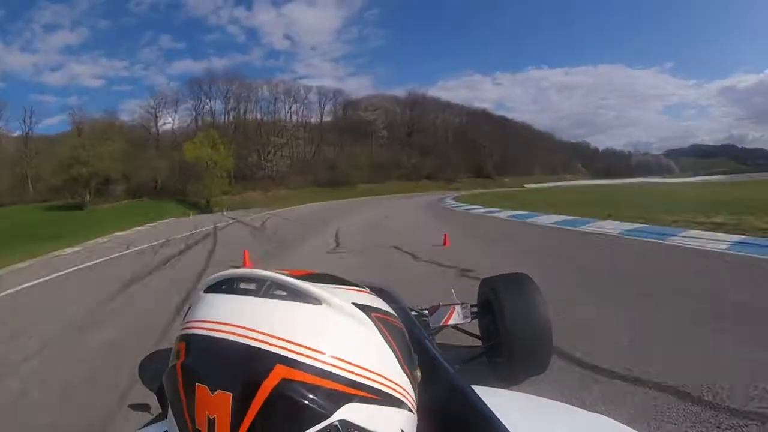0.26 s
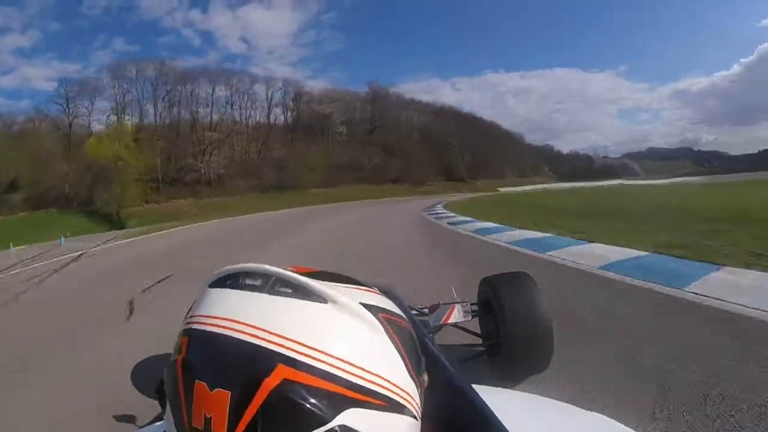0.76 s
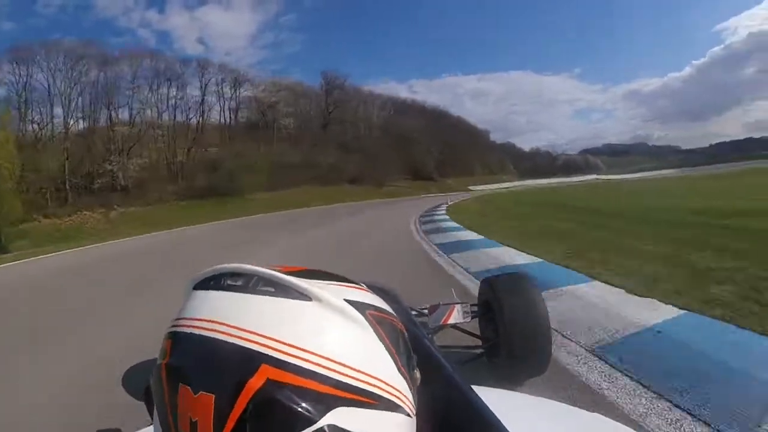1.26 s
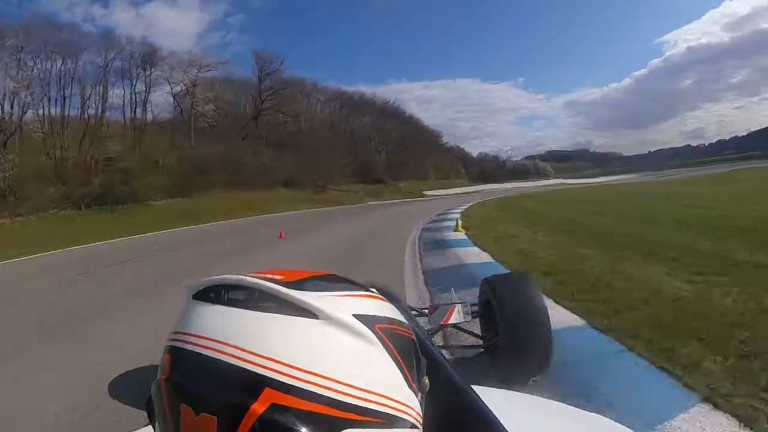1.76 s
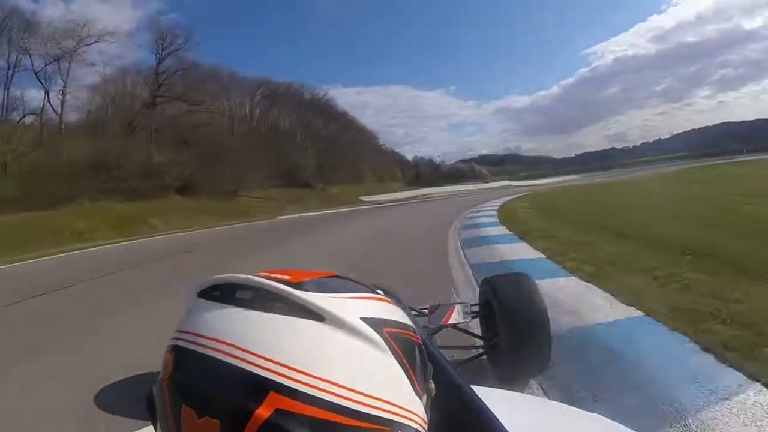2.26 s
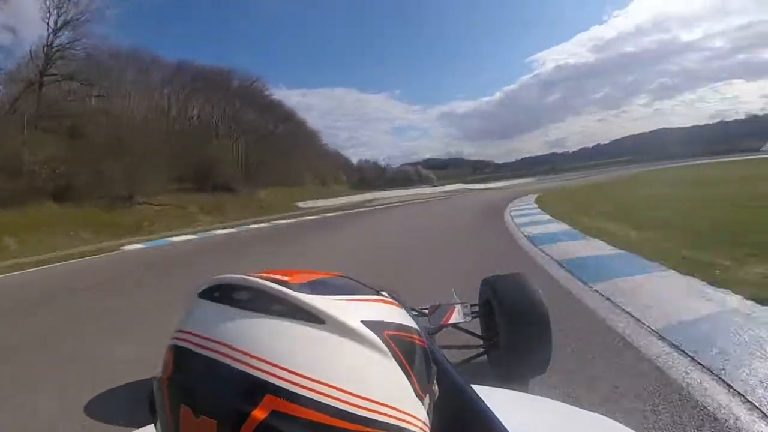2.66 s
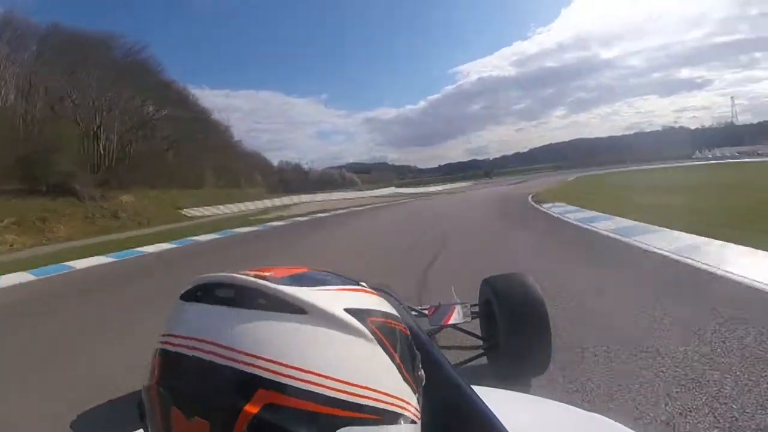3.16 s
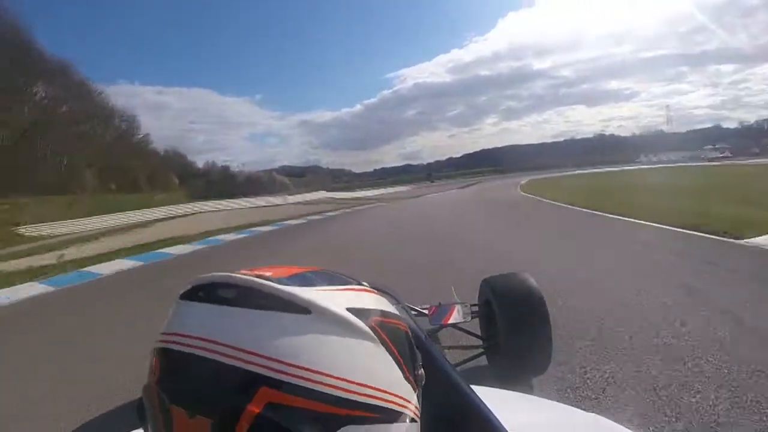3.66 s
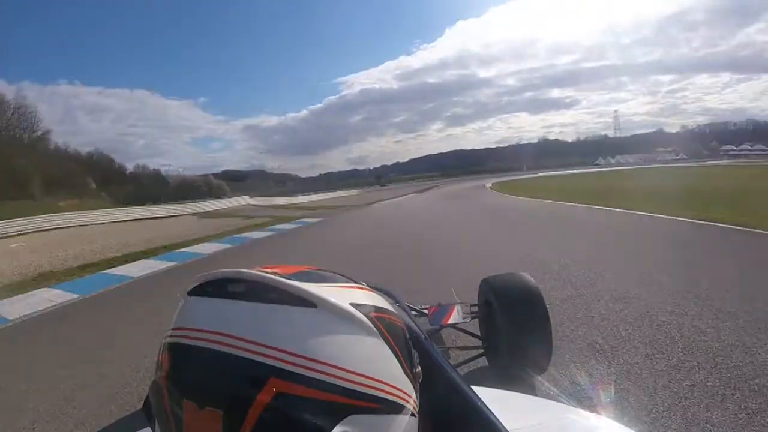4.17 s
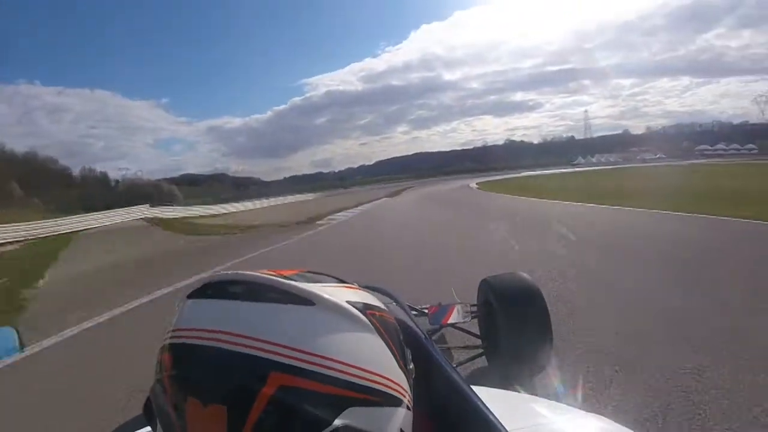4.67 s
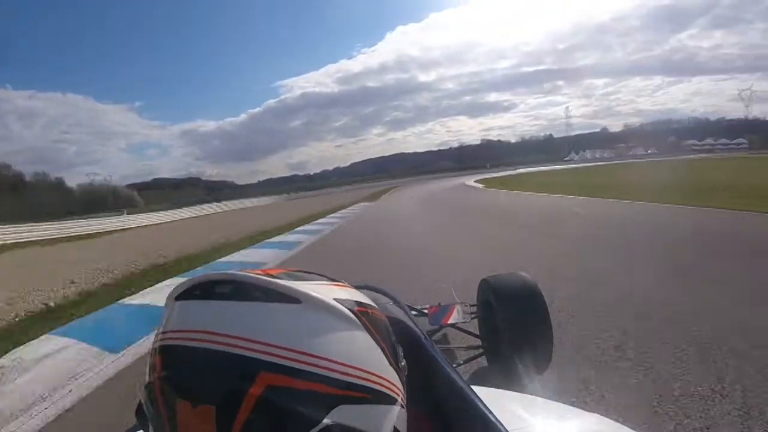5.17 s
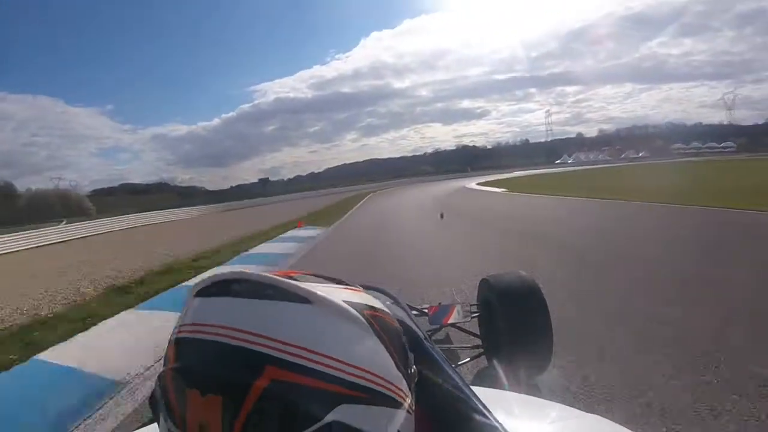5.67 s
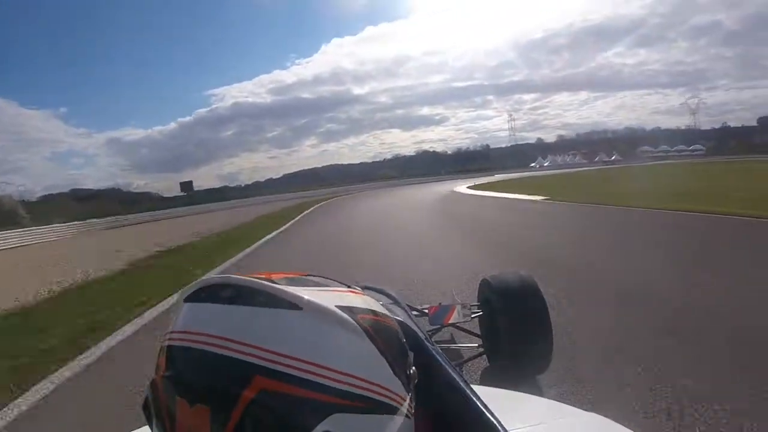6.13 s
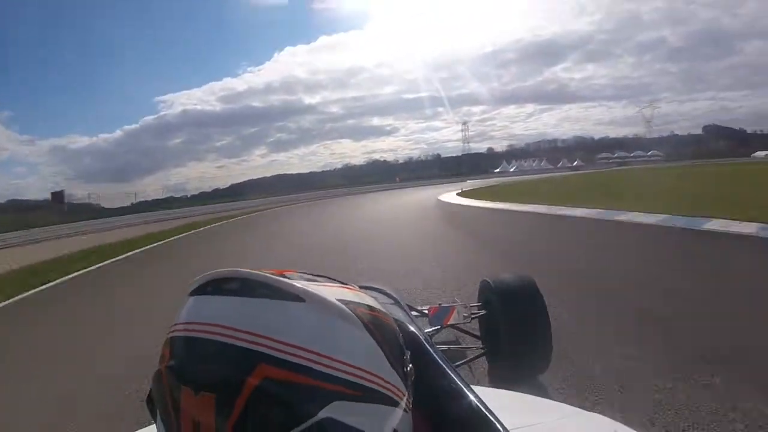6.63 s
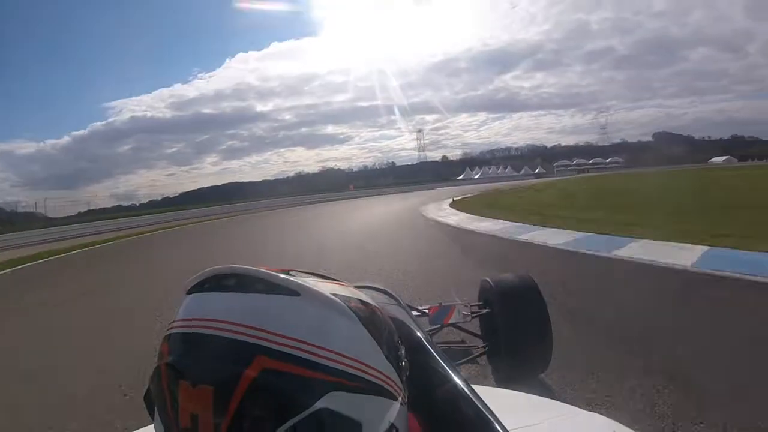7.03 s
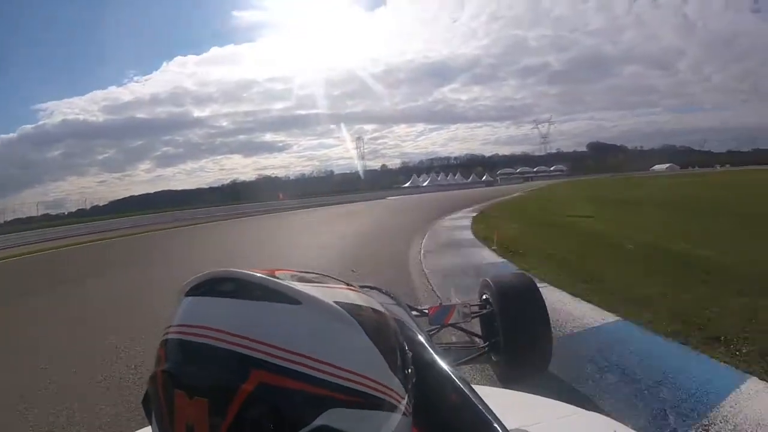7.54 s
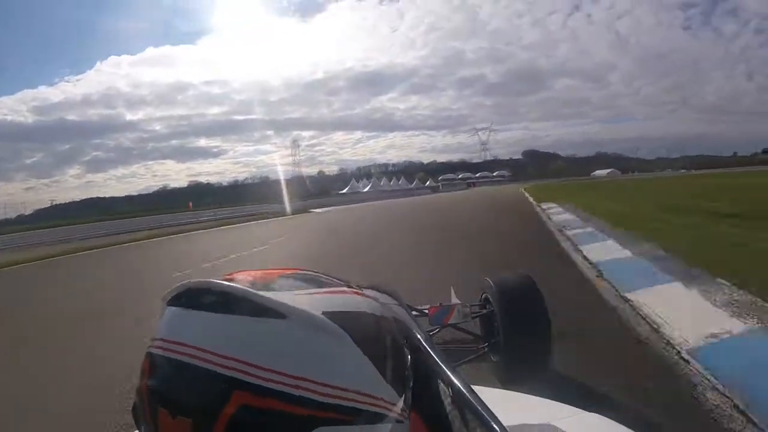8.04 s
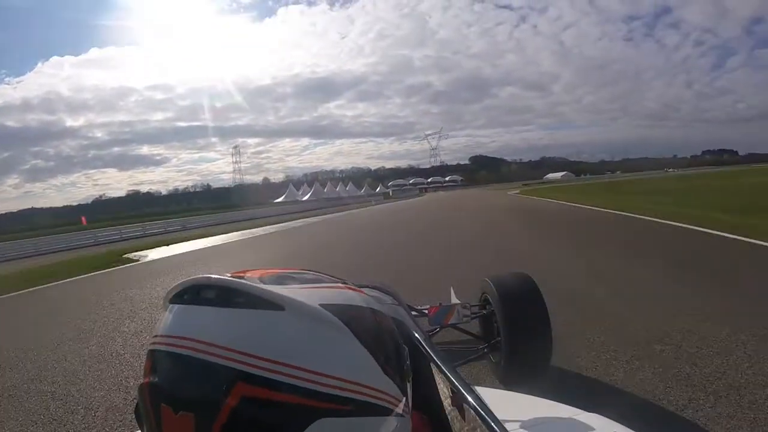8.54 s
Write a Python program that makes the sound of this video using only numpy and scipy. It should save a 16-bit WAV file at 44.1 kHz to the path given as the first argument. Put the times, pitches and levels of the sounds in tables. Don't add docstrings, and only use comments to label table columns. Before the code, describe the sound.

Close onboard sound of a single-seater racing car on an open track. A deep engine drone falls into a bend, with hard knocks on the chassis, then climbs steadily as the throttle opens, growing brighter and whistling. Over a rough kerb it rumbles harder, lifts and sinks to a heavy throb, then pulls away with a knock. A small camera fixed to the bodywork picks up vibration and muffled wind.

```python
import sys
import numpy as np
from scipy import signal
from scipy.fft import rfft, irfft
from scipy.io import wavfile
from scipy.ndimage import uniform_filter1d

SR = 44100
rng = np.random.default_rng(int(sys.argv[2]) if len(sys.argv) > 2 else 0)


def dump(signal):
    limited = np.clip(np.atleast_2d(signal).T, -1, 1)
    pcm = np.round(limited * 32767).astype(np.int16)
    wavfile.write(sys.argv[1], SR, pcm)


def voltage_ratio(level):
    return 10 ** (np.asarray(level, float) / 20)


N = 388080
TIME = np.arange(N) / SR

# time_s, crank_turns_hz
CRANK_SPEED = [(0, 91), (.3, 85.5), (.8, 80.2), (1.05, 79.4), (1.35, 79.4), (2.2, 84.2), (3, 87.1),
               (3.6, 91.3), (4.9, 103.2), (5.4, 107), (5.55, 102.5), (5.66, 107.3), (5.8, 101.5),
               (6.05, 98.8), (7.15, 88.5), (7.7, 85.2), (7.82, 88.3), (8.8, 92.5)]
# time_s, level_db
MOUNT_SHAKE = [(0, -26), (1, -22.5), (2.45, -23), (2.65, -41), (3, -28.5), (3.15, -16.5), (3.55, -25.5),
               (3.8, -18.5), (4.4, -15.5), (4.75, -18.5), (5.35, -20), (5.7, -13.5), (6.6, -13.5), (7, -11),
               (7.7, -11), (7.83, -15), (7.89, -22), (8.8, -23)]
# start_s, end_s, second_order_db, third_order_db
FIRING_SPELLS = [
    (-.1, .2, -47, -37),
    (1.607, 2.754, -45, -32.5),
    (3.15, 3.494, -38, -28.5),
    (3.673, 4.538, -26, -25.5),
    (4.504, 5.148, -30.5, -29.5),
    (5.496, 5.73, -28.5, -48),
    (6.2, 7.6, -35.5, -58),
    (7.881, 8.2, -26.5, -29),
    (8.194, 8.508, -29, -29.5),
    (8.468, 9, -24, -32),
]
# start_s, end_s, order_per_turn, level_db
PANEL_BUZZ = [(1.01, 1.28, 7, -30), (1.02, 1.3, 24, -46.5), (2.2, 3.2, 6, -35), (3.3, 4.3, 6, -34),
              (3.5, 4.3, 4.25, -34.5), (4.25, 5.35, 4, -36), (4.7, 5, 5, -31.5), (4.4, 5.1, 2.5, -33.5),
              (6.25, 7.15, 4.25, -38.5), (9, 16, 2.5, -34), (8.22, 9, 4.25, -30.5), (2.2, 1.8, 4.25, -33),
              (8.3, 10, 6, -48), (8.5, 11, 7, -40.5), (1.7, 2.7, 3.5, -36.5), (2.6, 3.3, 3.75, -35.5),
              (7.85, 8.05, 4.5, -34.5), (4.3, 4.75, 1.5, -31.5), (1.3, 1.8, 4.5, -38.5),
              (2.85, 3.4, 2.75, -31)]
# time_s, road_db, buffet_db, shake_db
TRACK_BUMPS = [(.12, 4, 3.5, 12.5), (.19, 1, -11, -3), (.44, 4.5, -2, -4), (.61, 8, 2, 4),
               (.69, -8, -5.5, -4), (.79, 7, -2.5, 1.5), (0.969, 5, 1, -11), (1.1, 0.5, -5, 6),
               (1.8, -0.5, 1.5, -10), (1.9, -2, 3.5, 6), (2, -3.5, 0.5, -16), (2.12, 1, 5.5, 3),
               (2.72, -5.5, 3, -1), (2.84, 2.5, 4.5, 5), (3.53, 7, .5, 5), (4, 5, -2.5, -6),
               (4.1, -3, 3, 3), (4.258, -8, 2, -4), (4.58, 7.5, -1, -5), (5.221, -4.5, -1, -1.5),
               (5.509, 6, .5, 1), (5.7, 2, .5, 2), (5.93, 9, 2.5, 0.5), (6.12, -2, 2.5, 1),
               (6.37, 4.5, 3.5, -0.5), (6.461, -1.5, -3, 1.5), (6.69, 8, -1.5, -1.5), (7.76, 1, .5, -2),
               (8.06, 1.5, -4.5, 5.5), (8.75, 5.5, 4.5, -8)]
# time_s, engine_load_db, airflow_db
LOAD_AND_AIR = [(0, 7, -4.5), (.155, 7, -5.5), (.2, -0.5, -19), (1, -3, -19.5), (1.4, 0.5, -11),
                (1.85, 2, -8.5), (2.3, 3.5, -4.5), (3, 5, 2.5), (3.6, 8.5, 1), (4.2, 4, 4), (5, 7.5, 4.5),
                (5.5, 1.5, -1.5), (5.75, -4.5, 3), (6.3, -6, 5.5), (6.75, -11, 3), (7.7, -11, 3.5),
                (7.95, -9, 7.5), (8.8, -2, 12.5)]
# db_per_load_db, db_per_airflow_db, lurch_db
NOISE_FOLLOWS = [
    (.1, 0.0845, 2),
    (.3, 0.06, 1.07),
    (.33, 0.2254, 1.05),
    (.7, 0.1139, 1.26),
]
NOISE_PITCH = [45, 200, 950, 3300]
# start_s, end_s, lifts_db (road, buffet, intake, rasp)
ROUGH_SURFACE = (5.2, 6.7, [3, 1.1, 1.5, .5])
# pitch_hz, level_db (per Hz)
ROAR_COLOUR = [(15, -10), (25, -9), (60, -2), (90, -3.5), (155, -8.5), (290, -12.5), (520, -16.5),
               (740, -20), (1100, -22.5), (1600, -27.5), (2300, -33), (3000, -38), (4200, -49),
               (6000, -65.5)]
# pitch_hz, width_hz, level_db
RINGING_PANELS = [
    (406, 29, -38),
    (500, 58, -49.5),
    (1030, 140, -50.5),
]
# pitch_hz, level_db (per Hz)
WHISTLE_COLOUR = [(3600, 0.5), (4200, -1.5), (5000, 7.5), (5600, 3.5), (5880, -18.5), (6060, -25.5),
                  (6250, -14.5), (6540, 3), (6900, -5.5), (8000, -12.5), (9100, -32), (9900, -47.5),
                  (12500, -65)]
# pitch_hz, level_db (per Hz)
HISS_COLOUR = [(3400, -21), (4300, -12), (4900, 2), (6600, 1.5), (8000, -7), (9100, -17), (10000, -31.5),
               (12500, -55)]
# start_s, thud_db, thud_pitch_hz, crack_db
CHASSIS_KNOCKS = [(.180, -17, 500, -18), (0.214, -2, 149, -17), (.219, -4, 426, -20.5),
                  (0.611, -13, 130, -20), (1.148, -5.5, 450, -16), (1.201, -15, 500, -23),
                  (1.229, -9, 500, -25), (1.365, -7, 109, -24.5), (1.456, -10, 450, -31),
                  (2.235, -16, 240, -27), (4.009, -3, 198, -23), (6.032, -6.5, 261, -20),
                  (6.509, -19, 300, -35), (7.095, -20, 300, -35), (8.049, -2, 161, -25)]
# centre_s, length_s, from_hz, to_hz, level_db
MARKER_SWISHES = [
    (7.848, .016, 7000, 3600, -36),
    (6.43, .02, 6500, 4000, -55),
]

LURCH_PER_S = 9


def columns(table):
    s, *rest = np.transpose(table)
    return [np.interp(TIME, s, column) for column in rest]


def unit(x):
    return x / np.sqrt(np.mean(x ** 2))


def walk(rate_hz):
    hold = max(int(SR / rate_hz / 32), 1)
    slow = np.repeat(rng.standard_normal(N // 32 // hold + 2), hold)
    slow = uniform_filter1d(uniform_filter1d(slow, hold), hold)
    return np.interp(np.arange(N) / 32, np.arange(len(slow)), unit(slow))


def bands(colour, octaves):
    hz, db = np.transpose(colour)
    pitch = np.log2(np.fft.rfftfreq(N, 1 / SR) + 1)
    spectrum = rfft(rng.standard_normal(N)) * voltage_ratio(np.interp(pitch, np.log2(hz), db, right=-120))
    for centre in np.arange(np.log2(hz[0]), np.log2(hz[-1]), octaves):
        distance = np.clip((pitch - centre) / octaves, -1, 1)
        share = np.cos(np.pi / 2 * distance) ** 2
        yield 2 ** centre, irfft(spectrum * share, N)


def ring(x, hz, width_hz):
    return signal.lfilter(*signal.iirpeak(hz, hz / width_hz, SR), x)


def spell(start, end, fade_s):
    return np.clip(np.minimum(TIME - start, end - TIME) / fade_s, 0, 1)


def bumps():
    s, *db = np.transpose(TRACK_BUMPS)
    coarse = TIME[::64]
    swell = np.array(db) @ np.exp(-((coarse - s[:, None]) / 0.035) ** 2)
    return [np.interp(TIME, coarse, row) for row in swell]


def engine_order(turns, order, db, waver_db, slip, span=slice(None)):
    level = np.sqrt(2) * voltage_ratio(db + waver_db * walk(14)[span])
    phase = order * turns[span] + slip * walk(9)[span] + rng.uniform(0, 2 * np.pi)
    return level * np.sin(phase)


def engine(turns):
    shake_db = columns(MOUNT_SHAKE)[0]
    loose_db = 0.2 * np.clip(-11.5 - shake_db, 0, 15) * walk(LURCH_PER_S)
    out = engine_order(turns, 1, shake_db + loose_db + bumps()[2], waver_db=-0.63, slip=0.23)

    second = sum(spell(start, end, 0.031) * voltage_ratio(db) for start, end, db, _ in FIRING_SPELLS)
    third = sum(spell(start, end, 0.031) * voltage_ratio(db) for start, end, _, db in FIRING_SPELLS)
    out += second * engine_order(turns, 2, 1, waver_db=1.3, slip=.15)
    out += third * engine_order(turns, 3, 1, waver_db=1.3, slip=.2)

    for start, end, order, db in PANEL_BUZZ:
        span = slice(int(start * SR), int(end * SR))
        quarter_order = round(4 * order) / 4
        buzz = engine_order(turns, quarter_order, db, waver_db=2.8, slip=.6, span=span)
        out[span] += spell(start, end, 0.031)[span] * buzz
    return out


def roar(turns):
    load_db, air_db = columns(LOAD_AND_AIR)
    levels = np.array([by_load * load_db + by_air * air_db + lurch_db * walk(LURCH_PER_S)
                       for by_load, by_air, lurch_db in NOISE_FOLLOWS])
    levels[:2] += bumps()[:2]
    rough_start, rough_end, lifts_db = ROUGH_SURFACE
    levels += np.outer(lifts_db, spell(rough_start, rough_end, .15))
    levels -= levels.mean(axis=1, keepdims=True)

    gust = walk(35)
    pulse_db = 0.64 * np.sin(turns) + 1.1 * np.sin(2 * turns)
    kinds = np.arange(len(NOISE_PITCH))
    out = 0
    for hz, band in bands(ROAR_COLOUR, octaves=0.607):
        place = np.interp(np.log(hz), np.log(NOISE_PITCH), kinds)
        weights = np.clip(1 - abs(place - kinds), 0, 1)
        flicker_db = 0.42 * gust + 0.41 * walk(20)
        out += band * voltage_ratio(weights @ levels + flicker_db + pulse_db * (hz > 300))

    shaken = rng.standard_normal(N) * voltage_ratio(levels[2])
    panels = sum(voltage_ratio(db) * unit(ring(shaken, hz, width)) for hz, width, db in RINGING_PANELS)
    return voltage_ratio(-18) * unit(out) + panels


def whistle_and_hiss():
    load_db, air_db = columns(LOAD_AND_AIR)
    gust = walk(25)
    whistle = sum(band * voltage_ratio(0.75 * gust + 0.26 * walk(12)) for _, band in bands(WHISTLE_COLOUR, octaves=.3))
    hiss = sum(band * voltage_ratio(0.77 * walk(5.3)) for _, band in bands(HISS_COLOUR, octaves=0.48))
    cancelled = np.clip((load_db + 6) / 9, 0, .97)
    hiss -= cancelled * ring(hiss, 6060, width_hz=220)
    return unit(whistle) * voltage_ratio(-50 + load_db) + unit(hiss) * voltage_ratio(-58.5 + air_db)


def knocks():
    out = np.zeros(N + SR)
    t = np.arange(SR // 20) / SR
    for s, thud_db, hz, crack_db in CHASSIS_KNOCKS:
        thud = -np.sin(2 * np.pi * hz * t) * np.exp(-(t * hz / 0.56) ** 2)
        burst = rng.standard_normal(len(t)) * np.exp(-t / 0.0029)
        crack = ring(ring(burst, 2400, width_hz=1600), 1400, width_hz=1800)
        out[int(s * SR):][:len(t)] += voltage_ratio(thud_db) * thud + voltage_ratio(crack_db + 4) * crack
    return out[:N]


def swish():
    out = 0
    for s, length, from_hz, to_hz, db in MARKER_SWISHES:
        x = (TIME - s) / length
        hz = from_hz + (to_hz - from_hz) * np.clip((x + 1) / 2, 0, 1)
        soft_noise = uniform_filter1d(uniform_filter1d(rng.standard_normal(N), size=8), size=6)
        carrier = np.sin(2 * np.pi * np.cumsum(hz) / SR)
        out += voltage_ratio(db) * np.exp(-x ** 2) * unit(soft_noise) * carrier
    return out


def scene():
    turns = 2 * np.pi * np.cumsum(columns(CRANK_SPEED)[0]) / SR
    return (engine(turns) + roar(turns) + whistle_and_hiss() + knocks() + swish())[None]


def mute_weak_treble(x, floor_db, wander_db, follow):
    hz, _, tiles = signal.stft(x, SR, nperseg=2048, scaling="psd")
    band = (hz // 230).astype(int)
    power = np.array([np.mean(abs(tiles[band == b]) ** 2, axis=0) for b in range(band[-1] + 1)])
    treble = power[20:24].mean(axis=0)
    up = np.minimum(rng.exponential(size=len(treble)), 2.9) ** 2 / 2
    down = np.minimum(rng.exponential(size=len(treble)), 2.9) ** 2 / 3
    threshold = voltage_ratio(floor_db + wander_db * (up - down)) ** 2 * (treble / np.median(treble)) ** follow
    keep = (power[band] > threshold) | (hz[:, None] < 3800)
    return signal.istft(tiles * keep, SR, nperseg=2048, scaling="psd")[1][:N]


def band_limit(x):
    return signal.sosfilt(signal.butter(12, 12400, fs=SR, output="sos"), x)


def record(dry):
    x = signal.sosfilt(signal.butter(2, 19, "high", fs=SR, output="sos"), dry[0])
    limited = np.tanh(1.276 * x) / 1.414
    mix = mute_weak_treble(limited, floor_db=-102, wander_db=3.0, follow=.35)
    return band_limit(mix[None])


dry = scene()
out = record(dry)
dump(out)
```